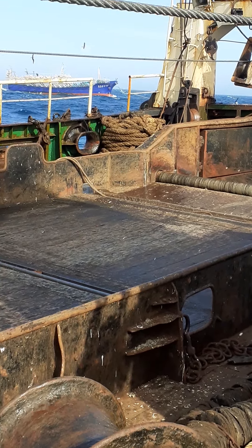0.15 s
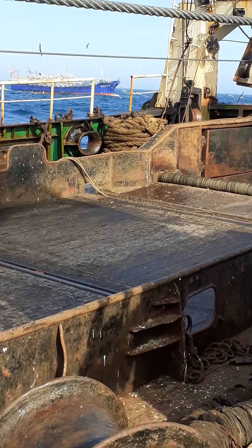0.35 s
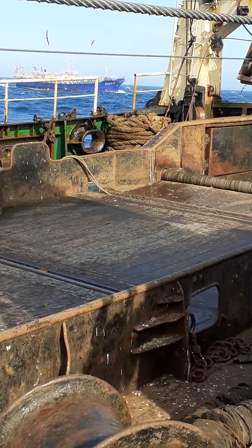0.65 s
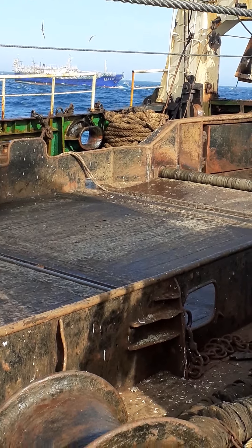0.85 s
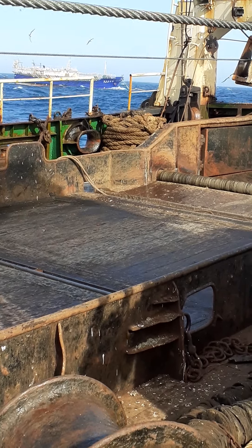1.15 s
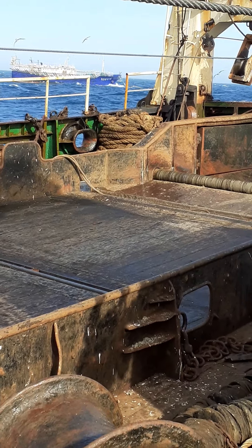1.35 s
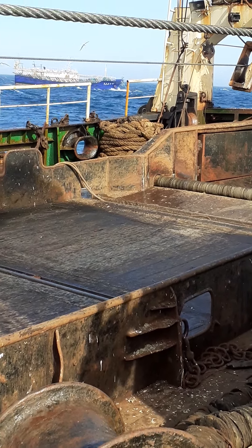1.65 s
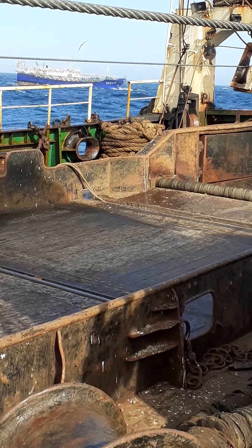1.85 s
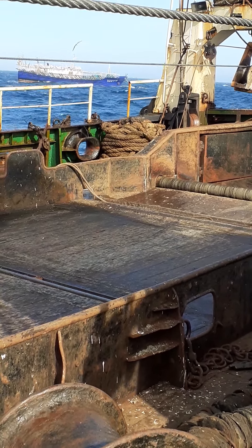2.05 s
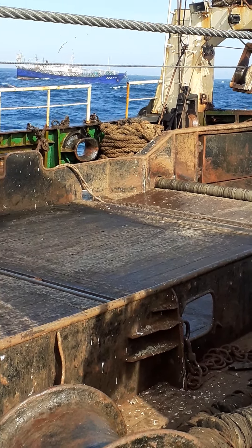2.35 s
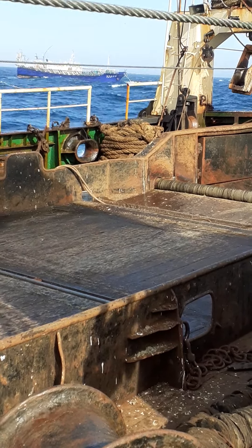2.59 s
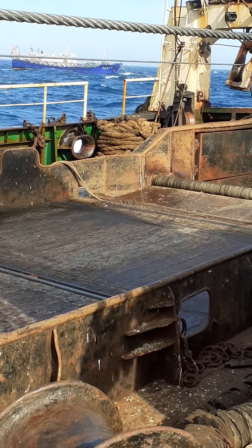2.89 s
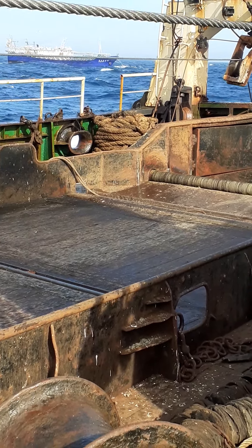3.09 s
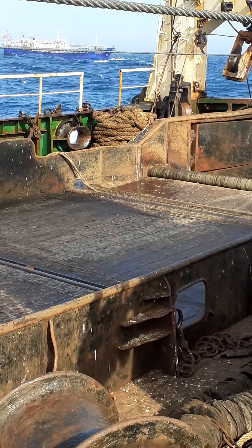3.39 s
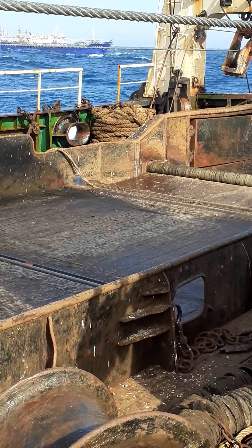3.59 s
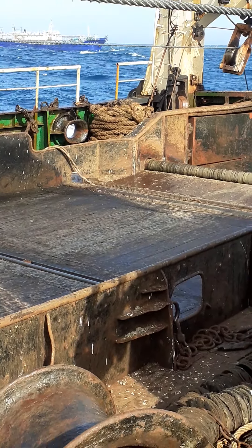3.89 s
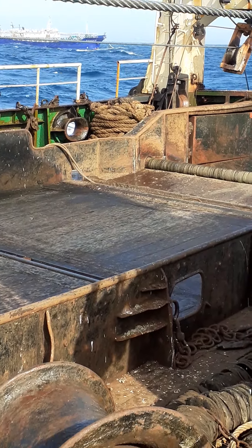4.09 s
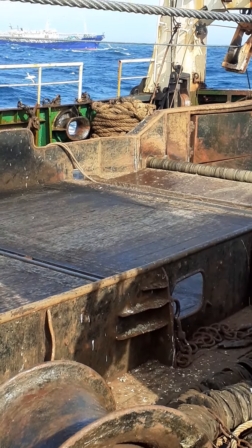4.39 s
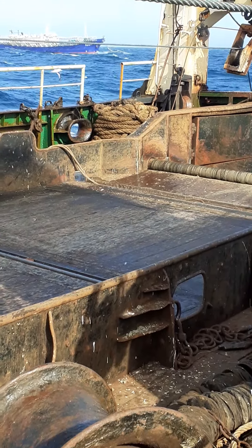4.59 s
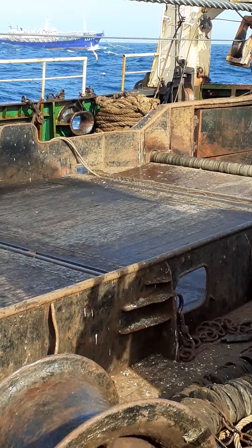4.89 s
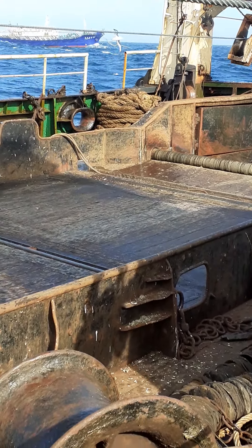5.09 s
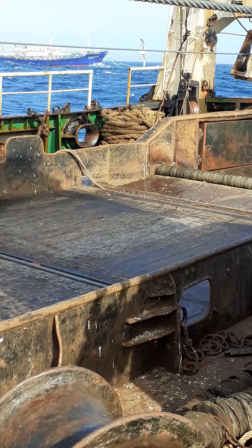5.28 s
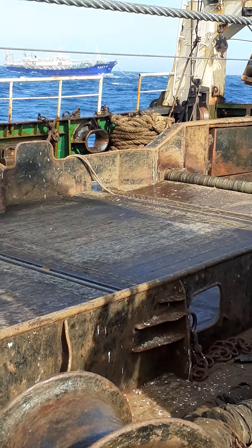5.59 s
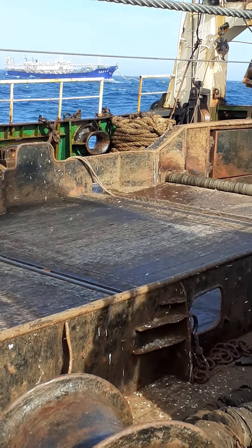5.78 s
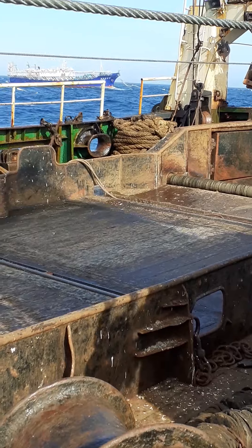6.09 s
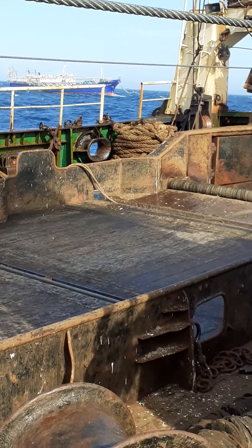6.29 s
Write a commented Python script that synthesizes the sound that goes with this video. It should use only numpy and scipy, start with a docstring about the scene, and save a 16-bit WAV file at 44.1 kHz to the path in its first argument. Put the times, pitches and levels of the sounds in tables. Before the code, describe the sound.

On an open steel deck at sea, a deep diesel throb and engine-room drone run without a break, close and steady. Quieter hums and whines of pumps waver above the engine, while water hisses faintly along the hull and wind lightly buffets the microphone. Now and then metal gear scrapes briefly, once near the start and a few more times later, with a short squeak near the end.

```python
"""A slow six-cylinder diesel thumps through its exhaust stack over a steel deck at sea.
Each firing is an impulse that excites a branch pipe and the stack: three strong, three weak.
Engine-room rumble and roar are noise coloured by the resonant plating; pumps and gears add whines.
The sea hisses along the hull, wind buffets the microphones, and loose gear scrapes now and then."""
import sys
import numpy as np
from scipy import signal
from scipy.io import wavfile
from scipy.ndimage import uniform_filter1d

SR = 44100
rng = np.random.default_rng(int(sys.argv[2]) if len(sys.argv) > 2 else 0)


def materialize(psi):
    """Save the field psi as 16-bit PCM at rate SR to the path in sys.argv[1].

    A 1-D psi becomes a single channel; in a 2-D psi each row is a channel.
    """
    bounded = np.clip(np.atleast_2d(psi).T, -1, 1)
    quanta = np.round(bounded * 32767).astype(np.int16)
    wavfile.write(sys.argv[1], SR, quanta)


N = 284445

ENGINE_LAG = 5  # samples by which the engine reaches the right microphone later
# Slow swell of the roar, which the sea hiss follows in part: (time [s], relative level [dB])
SWELL = [(0, -0.5), (.7, .8), (1.6, 0), (2.2, 0.2), (4.2, .3), (4.8, -1), (5.2, 1), (5.6, -1), (6.45, 1)]


def gain_of(db):
    """Amplitude ratio: tenfold for every 20 dB."""
    return 10 ** (np.asarray(db) / 20)


def unit_rms(x):
    """Normalisation to a mean power of 1."""
    return x / np.sqrt(np.mean(x ** 2) + 1e-20)


def at_frequency(points, hz):
    """Interpolation of a table on a logarithmic frequency axis."""
    f, value = np.transpose(points)
    return np.interp(np.log(hz + 1), np.log(f + 1), value)


def level(curve):
    """Linear interpolation of a (time [s], level [dB]) curve at every sample."""
    return np.interp(np.arange(N) / SR, *np.transpose(curve))


def drift(top_hz, step=256):
    """Superposed slow sines of random phase make a smooth fluctuation of rms 1."""
    t = np.arange(0, N, step) / SR
    rates = np.geomspace(.2, top_hz, num=24)
    waves = sum(np.sin(2 * np.pi * (f * t + rng.random())) / np.sqrt(f) for f in rates)
    return np.interp(np.arange(N) / SR, t, unit_rms(waves))


def plating_noise(spectrum, patchy_db, flicker_db, size, patch_bins, lag):
    """Source and filter: fluctuating noise shaped by the plating; rms 1, right channel lag in samples."""
    # Peaks and dips of the deck plating: (frequency [Hz], bandwidth [Hz], gain [dB])
    plating = [(195, 13, 10.5), (232, 14, 3), (250, 14, -8), (306, 16, 6.5), (355, 14, -5), (373, 14, 7),
               (420, 16, 3), (487, 12, -4), (530, 50, 6), (645, 25, -4), (750, 45, 4), (1000, 20, 2.5),
               (1052, 30, 7.5), (1130, 30, -2), (1230, 70, -2.5), (1400, 220, 1.5)]
    # Likeness of the sound at the two microphones: (frequency [Hz], correlation [1])
    correlation = [(30, .55), (60, .8), (130, .93), (250, .82), (330, .66), (900, .76), (1200, .4),
                   (1700, .62), (2100, .2), (3400, .5), (4400, .15), (6800, .38), (8600, .2), (12500, .3),
                   (15000, .15)]
    # Balance between the microphones: (frequency [Hz], left minus right level [dB])
    balance = [(60, -5), (130, 1.5), (290, -2.5), (640, 0), (1410, -3), (3100, -1.5), (6820, -2.5),
               (15000, 1)]
    hop = size // 4
    frames, hz = N // hop + 5, np.fft.rfftfreq(size, 1 / SR)
    a, b, c, d, patches = rng.standard_normal((frames, len(hz), 5)).T
    left, unrelated = a + 1j * b, c + 1j * d
    patches = uniform_filter1d(patches, size=12, axis=0)  # smoothed over frequency
    patches = unit_rms(uniform_filter1d(patches, size=patch_bins, axis=1))  # then over time bins
    flicker = unit_rms(uniform_filter1d(rng.standard_normal(frames), size=5))
    plating_db = sum(db / (1 + (2 * (hz - f) / width) ** 2) for f, width, db in plating)
    shape_db = at_frequency(spectrum, hz) + plating_db
    alike = at_frequency(correlation, hz)[:, None]
    delay = np.exp(-2j * np.pi * hz * lag / SR)[:, None]
    spectra = np.array([left, alike * delay * left + np.sqrt(1 - alike ** 2) * unrelated])
    spectra *= gain_of(shape_db[:, None] + patchy_db * patches + flicker_db * flicker)
    spectra *= gain_of(np.outer([.5, -.5], at_frequency(balance, hz)))[:, :, None]
    return unit_rms(signal.istft(spectra, nperseg=size, noverlap=size - hop)[1][:, :N])


def engine_cycles(t, steady_rpm=288.46, sag_rpm=2.96, sag_at_s=4.549, start_cycle=.2209):
    """Phase is the integral of speed, which the governor lets sag once and wins back more slowly."""
    sag_width_s = np.where(t < sag_at_s, .347, .566)
    rpm = steady_rpm - sag_rpm / np.cosh((t - sag_at_s) / sag_width_s)
    cycles = np.cumsum(rpm) / (120 * SR)  # four-stroke: two turns a cycle
    return cycles + start_cycle - np.interp(0, t, cycles)


def exhaust(load_db=.44, uneven_db=1.8, rise_s=.0077):
    """Impulse response: each firing puffs down its branch pipe, echoes once and rings the stack's modes."""
    # Cylinders: (firing point [cycle], relative level [dB], branch frequency [Hz],
    # puff time constant [s], echo delay [s], signed echo gain [1])
    cylinders = [(.1243, -7.4, 135.4, .005, .0424, .18), (.2786, -8.8, 111.1, .0042, .0274, -.62),
                 (.4668, -9.5, 132.8, .0056, .0526, -.73), (.6043, -25, 106.5, .009, .0508, -1.2),
                 (.781, -18.1, 138.6, .009, .0533, 1.2), (.9418, -23.4, 127.3, .009, .0386, -.56)]
    # Modes of the common stack: (frequency [Hz], signed amplitude [1], 60 dB decay time [s])
    stack_modes = [(50.1, -.025, .9), (78.3, -.16, .9), (90, -.153, .9), (101.5, 1.5, .04),
                   (122.2, 1.5, .123), (162.1, .973, .136), (190.3, .036, .9)]
    lead = SR  # the engine is already running
    cycles = engine_cycles((np.arange(N + lead) - lead) / SR)
    age, out = np.arange(lead) / SR, np.zeros(N + lead)
    stack = sum(amp * gain_of(-60 * age / t60) * np.sin(2 * np.pi * hz * age)
                for hz, amp, t60 in stack_modes)
    stack *= 1 - np.exp(-age / rise_s)
    for point, db, hz, puff_s, delay_s, echo_gain in cylinders:
        firings = np.flatnonzero(np.diff(np.floor(cycles - point)))
        blows = np.zeros(N + lead)
        blows[firings] = gain_of(db + load_db + uneven_db * rng.standard_normal(len(firings)))
        puff = (age / puff_s / 2) ** 2 * np.exp(2 - age / puff_s)
        branch = puff * np.sin(2 * np.pi * hz * age)
        echo = echo_gain * np.roll(branch, round(delay_s * SR))
        out -= signal.oaconvolve(blows, branch + echo + stack)[:N + lead]
    return np.array([gain_of(-2.0) * out, gain_of(-.13) * np.roll(out, ENGINE_LAG)])[:, lead:]


def engine_room_rumble():
    """Structure-borne sound: low engine-room noise comes up through the plating."""
    # Rumble ahead of the plating: (frequency [Hz], relative level [dB])
    spectrum = [(25, -37), (50, -21.5), (80, -5.5), (115, -2.5), (170, -8), (250, -3), (400, -11),
                (460, -17.5), (620, -23.5), (900, -39), (2000, -99.5)]
    # Slow envelope of the rumble: (time [s], level [dB])
    envelope = [(0, -21), (.6, -18.5), (2.8, -20.5), (3.4, -19), (4.6, -21), (5.2, -18), (5.7, -21),
                (6.45, -19.5)]
    rumble = plating_noise(spectrum, patchy_db=1.0, flicker_db=.9, size=4096, patch_bins=9, lag=ENGINE_LAG)
    return gain_of(level(envelope)) * rumble


def machinery_roar(db=-33):
    """Random amplitude modulation: short patches in midrange noise are heard as valve-gear clatter."""
    # Roar ahead of the plating: (frequency [Hz], relative level [dB])
    spectrum = [(290, -42), (500, -5), (700, -7.5), (1400, -7.5), (2000, -12.5), (2600, -16), (3100, -25.5),
                (4000, -45.5), (6000, -87)]
    roar = plating_noise(spectrum, patchy_db=2.5, flicker_db=.6, size=2048, patch_bins=3, lag=3.46)
    return gain_of(db + level(SWELL)) * roar


def sea_hiss(db=-48.5, swell_share=.6):
    """Broadband flow noise: the sea hisses along the hull."""
    # Hiss of the water: (frequency [Hz], relative level [dB])
    spectrum = [(1500, -38.5), (2800, -0.5), (3500, 1.5), (4400, 1), (6900, -3), (7600, -5), (8300, -6.5),
                (9000, -13), (9900, -17.5), (11000, -14), (12400, -9), (13300, -13), (14400, -17),
                (15500, -14.5)]
    hiss = plating_noise(spectrum, patchy_db=1.4, flicker_db=.63, size=512, patch_bins=9, lag=5.73)
    return gain_of(db + swell_share * level(SWELL)) * hiss


def whines(waver_db=4.5, wander=.00056):
    """Periodic vibration: hull, pumps and gears radiate tones that drift in level and slightly in pitch."""
    # Hull hums and whines of pumps and gears: (frequency [Hz], median rms level [dB])
    tones = [(36, -54), (50.4, -45), (263.8, -37), (401.7, -46), (471, -53), (526.9, -48), (657.4, -59),
             (791.3, -57), (942.1, -56), (1177.5, -62.5), (1292.6, -59), (1318.9, -56), (1413, -59)]
    out = np.zeros((2, N))
    for hz, db in tones:
        rms = gain_of(db + waver_db * drift(top_hz=3.3))
        turns = np.cumsum(hz * (1 + wander * drift(top_hz=2.18))) / SR + rng.random()
        side = [[0], [.13 * rng.standard_normal()]]  # a phase offset gives each tone its direction
        out += np.sqrt(2) * rms * np.sin(2 * np.pi * (turns + side))
    return out


def wind(db=-36, band_hz=(45, 380), lumpy_db=4.0):
    """Turbulent pressure: lumpy low buffeting, uncorrelated at the two microphones."""
    band = signal.butter(2, band_hz, "bandpass", fs=SR, output="sos")
    gusts = np.array([drift(top_hz=25, step=128) for _ in range(2)])
    pressure = signal.sosfilt(band, rng.standard_normal((2, N)))
    return gain_of(db) * unit_rms(pressure * gain_of(lumpy_db * gusts))


def scrapes(ramp_share=.7, ring_db=11.5, pan_db=-.5):
    """Friction excites resonance: a gliding band of rubbing noise rings the loose gear on the deck."""
    # Scrapes and squeaks: (time [s], duration [s], rub level [dB], start frequency [Hz],
    # end frequency [Hz], half bandwidth [Hz])
    strokes = [(0.778, 0.038, -37, 808, 900, 400), (2.669, 0.049, -47, 2690, 2390, 70),
               (3.53, 0.14, -44.5, 900, 1000, 400), (4.208, .025, -46, 2010, 2510, 900),
               (5.149, .11, -35.5, 1417, 2490, 480), (5.307, .07, -43.5, 2300, 1397, 700),
               (5.74, .03, -43, 2490, 3000, 1200)]
    # Resonances of the loose gear: (frequency [Hz], bandwidth [Hz], relative gain [dB])
    gear_modes = [(738, 24, 4), (1000, 50, -2.5), (1406, 40, -1), (1570, 30, -11), (2140, 25, -7),
                  (2620, 51, -18), (2800, 23, -7)]
    rubs, sides = np.zeros((2, N)), np.array([[.5], [-.5]])
    for start_s, length_s, db, from_hz, to_hz, half_width in strokes:
        count = round(length_s * SR)
        white = rng.standard_normal((2, SR // 4)) + 1j * rng.standard_normal((2, SR // 4))
        roughness = signal.lfilter(*signal.butter(2, half_width, fs=SR), white)[:, -count:]
        roughness[1] += roughness[0]  # partly alike at both microphones
        turns = np.cumsum(np.linspace(from_hz, to_hz, count)) / SR
        rub = (roughness * np.exp(2j * np.pi * turns)).real
        rub *= signal.windows.tukey(count, ramp_share) / rub.std(axis=1)[:, None]
        rubs[:, round(start_s * SR):][:, :count] += gain_of(db + sides * pan_db) * rub
    ringing = sum(gain_of(ring_db + db) * signal.lfilter(*signal.iirpeak(hz, hz / width, fs=SR), rubs)
                  for hz, width, db in gear_modes)
    return rubs + ringing


def scene():
    """Superposition: the pressures of engine, sea, wind and deck gear add at the two microphones."""
    background = engine_room_rumble() + machinery_roar() + sea_hiss()
    return exhaust() + background + whines() + wind() + scrapes()


def record(dry):
    """Compression and band limiting: bass cut, gain control on strong firings, soft peaks, treble cut."""
    low_hz, high_hz, ceiling = 26, 15720, 1.04
    threshold_db, slope, recovery_db_per_s, makeup_db = -12.5, .13, 12.0, 2.0
    dry = signal.lfilter(*signal.butter(2, low_hz, "highpass", fs=SR), dry)
    power_db = 10 * np.log10(abs(uniform_filter1d((dry ** 2).mean(0), size=800)) + 1e-12)
    fall_db = np.arange(N) * recovery_db_per_s / SR
    held_db = np.maximum.accumulate(power_db + fall_db) - fall_db  # peak detector with slow recovery
    over_db = uniform_filter1d(np.maximum(held_db - threshold_db, 0), size=400)
    ducked = dry * gain_of(makeup_db - slope * over_db)
    rounded = ducked / (1 + (ducked / ceiling) ** 4) ** (1 / 4)
    lowpass = signal.firwin(1023, high_hz, window=("kaiser", 9), fs=SR)
    return signal.oaconvolve(rounded, lowpass[None], "same")


dry = scene()
out = record(dry)
materialize(out)
```